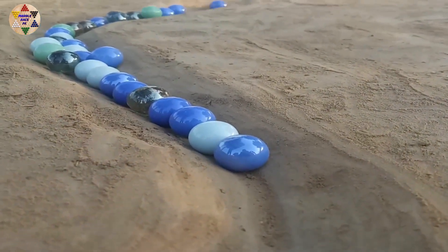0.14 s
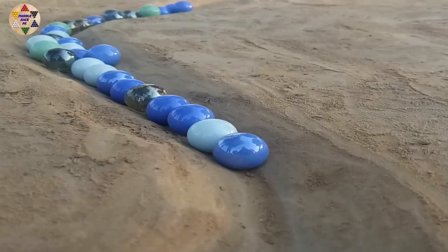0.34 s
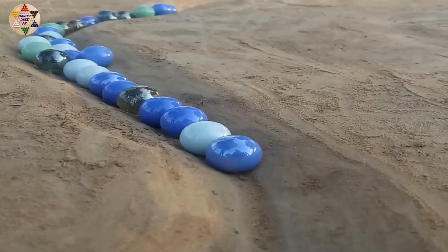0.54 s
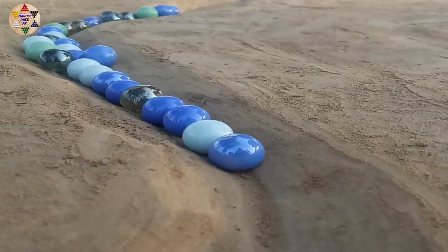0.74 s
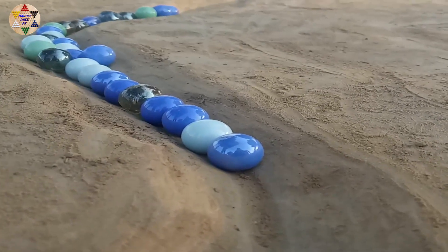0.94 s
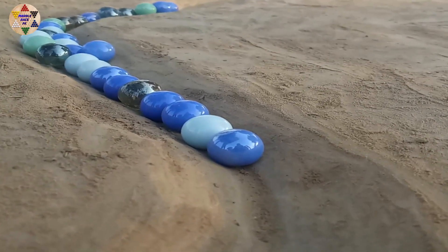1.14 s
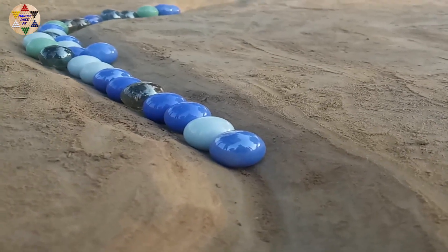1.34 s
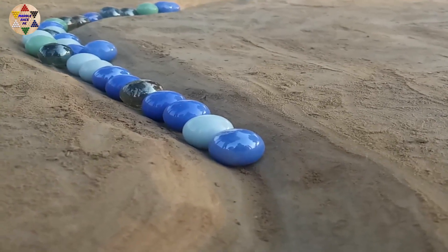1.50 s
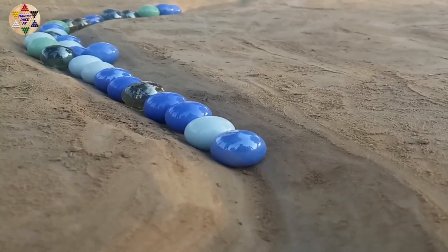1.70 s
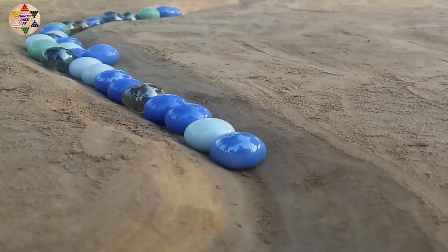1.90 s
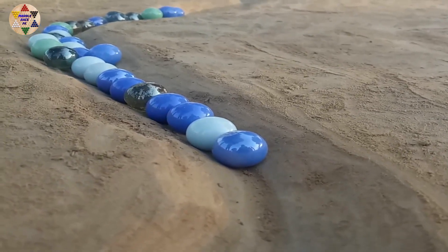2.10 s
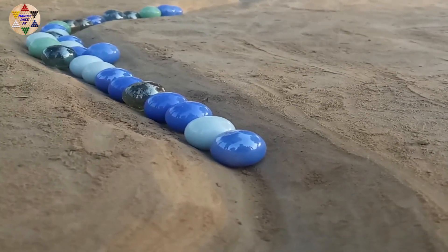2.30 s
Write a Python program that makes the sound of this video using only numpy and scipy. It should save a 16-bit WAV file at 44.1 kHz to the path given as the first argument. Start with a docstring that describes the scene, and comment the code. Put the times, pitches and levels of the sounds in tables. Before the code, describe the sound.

Close glass marbles clatter in quick bursts, drop to scattered clicks, then bunch up again. Underneath are a faint hiss of rolling on packed sand and a soft rumble from the hand-held microphone, which is bumped twice early on.

```python
"""Marbles rolling in sand

A train of glass marbles rolls down a groove in packed sand, close to a hand-held microphone and mostly
to its left. Friction gives a gritty hiss, and a soft rumble lies under everything. Collisions excite
flurries of very short clicks, each scattered by the neighbouring marbles. Two low bumps, the first
one double, jolt the microphone."""
import sys
import numpy as np
from scipy import signal
from scipy.fft import rfft, irfft
from scipy.io import wavfile

SR = 44100
rng = np.random.default_rng(int(sys.argv[2]) if len(sys.argv) > 2 else 0)


def to_wav(sig):
    """Store sig (one row per channel, or 1-D mono) as 16-bit WAV at the path in sys.argv[1].

    Samples outside -1..1 are clipped; the rate is SR.
    """
    pcm = np.clip(np.atleast_2d(sig), -1, 1) * 32767
    pcm = np.round(pcm).astype(np.int16)
    wavfile.write(sys.argv[1], SR, pcm.T)  # frames by channels


N = 103635
RIGHT_LEAD_S = .00022  # the marbles are heard slightly sooner on the right


def undb(db):
    """Amplitude ratio of a level in decibels."""
    return 10 ** (np.asarray(db) / 20)


def curve(table, column=1):
    """Linear interpolation of one column of a table over time."""
    rows = np.array(table)
    return np.interp(np.arange(N) / SR, rows[:, 0], rows[:, column])


def response(spectrum, size):
    """Magnitude response at each transform bin, interpolated in level against log frequency."""
    hz, db = np.array(spectrum).T
    f = np.maximum(np.fft.rfftfreq(size, 1 / SR), 1)
    return undb(np.interp(np.log(f), np.log(hz), db))


def filtered(x, spectrum):
    """Zero-phase filtering by multiplication of spectra."""
    return irfft(rfft(x) * response(spectrum, N), N)


def noise(spectrum, envelope=1):
    """White noise, amplitude-modulated, then filtered and scaled to unit variance."""
    y = filtered(envelope * rng.standard_normal(N), spectrum)
    return y / y.std()


def flicker(rate_hz):
    """Random modulation of unit variance, interpolated between independent values."""
    y = np.interp(np.arange(N) / SR * rate_hz, np.arange(N), rng.standard_normal(N))
    return y / y.std()


def unit(x):
    """Normalisation to unit energy."""
    return x / np.sqrt(np.sum(np.abs(x) ** 2))


def add(track, at_s, sound):
    """Superposition of a short sound on a track."""
    i = int(np.clip(round(at_s * SR), 0, N - 1))
    track[i:i + len(sound)] += sound[:N - i]


# Envelopes of rolling: t/s, relative grinding level/dB, relative grit level/dB
ROLLING_LEVELS = [(0, -40.5, -39.5), (.2, -40, -42.5), (.44, -42.5, -57), (.5, -65, -51.5),
                  (.54, -44.5, -60), (.62, -39, -51), (.79, -39.5, -43.5), (.86, -39.5, -39),
                  (.97, -37.5, -43.5), (1.06, -49, -41), (1.28, -37.5, -47), (1.52, -39.5, -46),
                  (1.61, -36.5, -37.5), (1.66, -49, -43), (1.8, -38.5, -36.5), (1.95, -48.5, -33.5),
                  (1.995, -51, -35.5), (2.05, -37.5, -38), (2.18, -43.5, -50.5), (2.35, -44, -53)]
# Spectra of grinding and of fine grit: f/Hz, level/dB
GRIND_SPECTRUM = [(150, -11.5), (350, -6), (650, -1), (900, -2), (1100, -1), (1350, 0.5), (1900, -0.5),
                  (2600, -19.5), (6000, -45.5)]
GRIT_SPECTRUM = [(900, -8), (1800, 0.5), (2500, 6.5), (3200, 3), (4200, 0), (5000, -16), (6200, -14),
                 (7300, -13.5), (9000, -25), (15500, -30)]
# Transmission of rolling to the right side: f/Hz, gain/dB
ROLLING_SHADOW = [(200, -7.5), (750, -6), (1300, -20.5), (2400, -20), (4400, -9), (15000, -16)]
def rolling(coherence=.7):
    """Friction noise: glass grinds over sand and crushes fine grains; the right side lies in shadow."""
    grind_gain = undb(curve(ROLLING_LEVELS) - 0.5 + 3 * flicker(rate_hz=60))
    grit_gain = undb(curve(ROLLING_LEVELS, column=2) + 3)
    grains = undb(4 * flicker(rate_hz=640))
    left, independent = (grind_gain * noise(GRIND_SPECTRUM) + grit_gain * noise(GRIT_SPECTRUM, grains)
                         for _ in range(2))
    advanced = np.roll(left, -int(RIGHT_LEAD_S * SR))
    right = coherence * advanced + np.sqrt(1 - coherence ** 2) * independent
    return np.array([left, filtered(right, ROLLING_SHADOW)])


# Spectrum of the rumble: f/Hz, level/dB
RUMBLE_SPECTRUM = [(35, -14), (65, 1), (110, 0), (155, -1), (210, -11.5), (350, -15.5), (800, -18),
                   (3000, -56)]
# Envelope of the rumble: t/s, level/dB
RUMBLE_ENVELOPE = [(0, -48.5), (.12, -40), (.3, -42), (.42, -39), (.6, -41), (.75, -38), (1.0, -43.5),
                   (1.13, -50), (1.3, -41.5), (1.61, -40), (1.65, -47.5), (1.82, -51.5), (2.0, -43.5),
                   (2.3, -39.5)]
def rumble(right_db=-6.5):
    """Handling noise: the moving microphone rumbles, in phase on both sides."""
    return undb([[0], [right_db]]) * undb(curve(RUMBLE_ENVELOPE)) * noise(RUMBLE_SPECTRUM)


# Light contacts between the clicks: t/s, rate/(1/s)
CONTACT_RATE = [(0, 130), (.17, 230), (.23, 200), (.3, 74), (.42, 98), (.45, 1), (.58, 0.56), (.75, 9.5),
                (1.04, 13), (1.1, 111), (1.3, 293), (1.42, 167), (1.52, 11.7), (1.69, 13.2), (1.73, 296),
                (1.775, 43), (1.85, 280), (1.96, 657), (1.995, 10), (2.03, 340), (2.08, 240), (2.11, 19)]
def jostling(count=400, centre_hz=3230, chatter_db=-1.5):
    """A random point process: light contacts grow denser and stronger where the train bunches up."""
    rate = curve(CONTACT_RATE)
    expected_count = np.cumsum(rate) / SR
    onsets = np.searchsorted(expected_count, np.arange(count) + rng.uniform(-1, 1, count))
    contacts = []
    for i, (strength, pitch, treble) in zip(onsets, rng.standard_normal((count, 3))):
        if i < N:
            db = -29 + 1.5 * strength + 3 * np.log2(rate[i] / 200)  # 3 dB per doubling of the rate
            contacts.append((i / SR, db, centre_hz * 2 ** (0.092 * pitch), -15 + 2 * treble, chatter_db))
    return collisions(contacts)


def minimum_phase(gain, size):
    """Causality: folding the cepstrum onto positive time gives the spectrum of a minimum-phase pulse."""
    cepstrum = irfft(np.log(gain))
    cepstrum[1:size // 2] *= 2
    cepstrum[size // 2 + 1:] = 0
    return np.exp(rfft(cepstrum))


# Scattering, strongest in the treble: f/Hz, relative gain/dB
SCATTER_SPECTRUM = [(500, 3.5), (1200, 0.5), (2500, -1.5), (4500, 3), (7000, 3.5), (14000, 7.5)]
def echoes(pulse_spectrum, decay_s, size):
    """Diffuse scattering: convolution with a decaying noise burst makes dense copies of a pulse."""
    t = np.arange(size) / SR
    reflections = rng.standard_normal(size) * np.sqrt(t) * np.exp(-t / decay_s)
    return unit(irfft(pulse_spectrum * response(SCATTER_SPECTRUM, size) * rfft(reflections)))


# Spectra of a click's body and of its treble snap: f/Hz, level/dB
BODY_SPECTRUM = [(100, -24), (550, -14), (900, 3.5), (1300, 1.5), (2100, 0.5), (2600, 1.5), (3300, -2),
                 (4300, -1), (5000, -12), (5800, -10), (6600, -73), (12000, -35)]
SNAP_SPECTRUM = [(1000, -31), (4500, -3), (5600, -2), (6300, 0), (7100, 5), (8700, -12.5), (10000, -13.5),
                 (11500, -10.5), (13000, -21), (15200, -19.5), (17000, -10)]
def click(hz, cutoff_hz, treble_db, chatter_db, scatter_s=0.00072, bank_s=0.0025, size=1024):
    """Damped resonance: an impact rings for a few cycles and reflects off marbles and sand banks."""
    f = np.fft.rfftfreq(size, 1 / SR) + 1
    half_width_oct = 0.26 * 2 ** rng.uniform(-.7, .7)
    resonance = undb(-18) + 1 / np.hypot(1, np.log2(f / hz) / half_width_oct)
    body = response(BODY_SPECTRUM, size) * resonance / np.hypot(1, (cutoff_hz / f) ** 2)
    snap = undb(treble_db - 1) * unit(response(SNAP_SPECTRUM, size))
    pulse = minimum_phase(np.hypot(unit(body), snap), size)
    left = unit(unit(irfft(pulse)) + undb(chatter_db - 2) * echoes(pulse, scatter_s, size))
    right = left + undb(-2) * echoes(pulse, scatter_s, size)
    sides = [unit(side + undb(-10.5) * echoes(pulse, bank_s, size)) for side in (left, right)]
    return np.array(sides) * np.sqrt(SR / 1000)  # the energy of 1 ms at unit level


# Marble against marble: t/s, level over 1 ms/dB, resonance f/Hz, relative treble/dB, relative chatter/dB
IMPACTS = [(0.0143, -15.5, 3930, -12, -5), (0.0279, -15.5, 3080, -14, -21), (0.0552, -14, 2960, -12, -13),
           (0.0877, -20.5, 3580, -14, 2), (0.0933, -17.5, 1520, -18, -4), (0.1001, -20, 2950, -14, -4),
           (0.1196, -14.5, 4040, -14, -2), (0.1212, -20, 3200, -8, 13), (0.1312, -16.5, 2800, -24, 1),
           (0.1522, -14, 2680, -16, -1), (0.1747, -17.5, 3380, -14, -25), (0.2125, -15.5, 3800, -11.5, 2),
           (0.2144, -13.5, 3270, -10, -1), (0.2168, -15.5, 3300, -31, 7), (0.2575, -12.5, 3160, -10, 1),
           (0.2654, -13.5, 2520, -8, -2), (0.2929, -16.5, 1860, -14, 4), (0.304, -17, 3400, -4, 3),
           (0.3071, -30, 3080, 10, -14), (0.3227, -11.5, 4430, -8, -10), (0.3493, -15, 3540, -14, 4),
           (0.366, -31, 3160, -3, 5), (0.3728, -17.5, 2130, -23, 9), (0.3803, -15, 2340, -11, -6),
           (0.3988, -16.5, 1629, -13, 14), (0.401, -16.5, 3350, -20, -14), (0.4282, -16.5, 2720, -7, -8),
           (0.4305, -13, 3500, -16, 10), (0.4454, -13.5, 3580, -12, -2), (0.539, -20, 2020, -13, 9),
           (0.5534, -22.5, 3680, -5, 17), (0.5626, -21.5, 3300, -8, -11), (0.5742, -13.5, 2520, -19, 0),
           (0.5763, -12, 3500, -7, -4), (0.614, -23, 2070, -10, -14), (0.6209, -19, 1490, -29, 16),
           (0.6302, -16.5, 2230, -11.5, -1), (0.6679, -27.5, 2300, -17, -6), (0.6825, -19.5, 1350, -38, -7),
           (0.6885, -13.5, 2290, -13.5, -40), (0.7112, -27, 3280, -22, 1), (0.7975, -15, 2260, -9.5, -12),
           (0.9502, -14, 2710, -16, -17), (0.9527, -13, 2577, -6.5, -14), (1.0061, -16.5, 3390, -15.5, -3),
           (1.033, -8.5, 2940, -14.5, -4), (1.0755, -21, 2525, -17, 11), (1.0986, -21, 3273, -35, 6),
           (1.1048, -18, 2980, -15, 13), (1.1148, -14, 3460, -12, -21), (1.1535, -23, 3164, -6, -4),
           (1.1634, -13.5, 2938, -11, -32), (1.1668, -16, 2720, -17, -1), (1.1713, -16, 3222, -23, -15),
           (1.1765, -42, 2900, -6, -9), (1.1819, -17.5, 3095, -23, -24), (1.1895, -13, 4100, -6, -31),
           (1.1913, -10.5, 2870, -14, -4), (1.1942, -15.5, 2550, -17, -27), (1.2472, -20, 1820, -10, -18),
           (1.2604, -14, 2830, -9, -17), (1.2763, -14.5, 2880, -18, 18), (1.2921, -15, 3420, -24, -2),
           (1.3005, -20, 2870, -12, 0), (1.3111, -26, 3840, -13, -10), (1.3189, -13, 2510, -17.5, -1),
           (1.3388, -19, 3708, -9, -17), (1.3632, -14, 3395, -14, -3), (1.3887, -18.5, 2635, -7.5, 7),
           (1.3964, -20, 3502, -21, -2), (1.4278, -16.5, 2630, -15, 7), (1.4458, -17, 2830, -12.5, 25),
           (1.5036, -22, 2547, -13, -6), (1.6385, -13, 2782, -8.5, -9), (1.6443, -11.5, 3180, -18, 7),
           (1.67, -10, 2400, -12.5, -10), (1.6996, -11, 2500, -24, 4), (1.7048, -16, 2800, -7, -13),
           (1.7069, -13.5, 2810, -24, 17), (1.712, -9.5, 3420, -14, -1), (1.7147, -16, 3100, -19, -6),
           (1.7293, -23, 3425, -10, -3), (1.7332, -14, 3430, -16, 4), (1.7403, -17, 3270, -14, 1),
           (1.7501, -14, 3340, -18, -16), (1.7561, -9.5, 2250, -12, -1), (1.7883, -16.5, 3000, -14, 5),
           (1.796, -16.5, 2864, -8.5, 0), (1.8054, -10.5, 2954, -12, 4), (1.8078, -13, 3800, -24, 18),
           (1.8094, -12.5, 2207, -21, -8), (1.8193, -13, 3370, -7, -8), (1.8366, -18, 2690, -6, -4),
           (1.8612, -18.5, 3150, -12, -4), (1.877, -32, 2992, -7, 7), (1.8863, -18.5, 3480, -6, -3),
           (1.8935, -17, 2706, -14, -5), (1.8987, -15, 2794, -12, -11), (1.9042, -22.5, 3000, -10, -4),
           (1.9242, -12, 3442, -11, -21), (1.9426, -25, 3368, 0, 20), (1.9476, -16, 3300, -13, 15),
           (1.9519, -19, 2824, -13, -9), (1.9578, -16, 2906, -10, -8), (1.9661, -26, 3222, -20, -10),
           (1.9761, -14.5, 3570, -8, -11), (1.9799, -17, 2630, -12, -14), (2.0126, -19, 3100, -12, -11),
           (2.0238, -17, 2750, -13, -5), (2.04, -13.5, 2330, -17, -4), (2.0512, -16, 1280, -12, -6),
           (2.0544, -21, 3127, -12, -13), (2.067, -12, 2930, -18, -12), (2.0755, -17, 2903, -8, -12),
           (2.0895, -21, 1844, -21, 13), (2.1202, -18, 2623, -14, -9), (2.1237, -20.5, 3140, -17, 8),
           (2.1372, -15, 2740, -15, -9), (2.145, -15, 3200, -22, 10), (2.1631, -13.5, 2500, -15, -8),
           (2.2069, -23, 2080, -15, -19), (2.2115, -22, 3137, -12, 6), (2.2186, -24, 3180, -11, 1),
           (2.2266, -19, 1930, -29, 1), (2.2326, -19, 2828, -11.5, -4), (2.2889, -27.5, 3060, -19, -6),
           (2.2965, -25.5, 2107, -20, -6), (2.335, -26, 1980, -18, -13)]
# Lower edge of the click spectrum, highest as the last flurry starts: t/s, f/Hz
LOW_CUTOFF = [(.7, 595), (1.6, 1100), (1.67, 1880), (1.82, 1860), (1.9, 800)]
# Transmission of clicks to the right side: f/Hz, gain/dB
CLICK_SHADOW = [(800, -9), (1400, -12.5), (2300, -15.5), (3500, -9.5), (7000, -7.5), (15000, -8.5)]
def collisions(contacts):
    """Impact sound: each contact radiates one click, which reaches the right side attenuated."""
    left, right = np.zeros((2, N))
    for at_s, db, hz, treble_db, chatter_db in contacts:
        cutoff_hz = np.interp(at_s, *np.array(LOW_CUTOFF).T)
        sides = undb(db) * click(hz, cutoff_hz, treble_db, chatter_db)
        add(left, at_s, sides[0])
        add(right, at_s - RIGHT_LEAD_S, sides[1])
    return np.array([left, filtered(right, CLICK_SHADOW)])


# Jolts of the microphone: t/s, level/dB, starting f/Hz, glide time/s, decay time/s, relative rattle/dB
JOLTS = [(0.4584, -2, 743, 0.00214, 0.0037, -40), (0.4685, 5.5, 928, 0.0015, 0.0015, -12.5),
         (0.8327, -8, 315, 0.0028, 0.0092, -46)]
# Spectrum of the rattling casing: f/Hz, level/dB
CASING_SPECTRUM = [(300, -10), (750, 5), (1300, -6), (1800, -15), (2400, -7), (3300, -32), (7000, -55)]
# Transmission of bumps to the right side: f/Hz, gain/dB
BUMP_TRANSMISSION = [(300, -2.5), (550, -9), (1200, -6)]
def bumps(end_hz=86, attack_s=0.00032, ring_s=0.012, rattle_s=0.0037, length_s=0.044, lag_s=.00061):
    """Structure-borne sound: a knock rattles the casing and sinks within a few cycles to a low boom."""
    left, right = np.zeros((2, N))
    t = np.arange(int(length_s * SR)) / SR
    window = (1 - np.exp(-t / attack_s)) * np.cos(np.pi / 2 * t / length_s)
    for at_s, db, hz, glide_s, decay_s, rattle_db in JOLTS:
        cycles = end_hz * t + (hz - end_hz) * glide_s * (1 - np.exp(-t / glide_s))
        decay = np.exp(-t / decay_s) + undb(-14.5) * np.exp(-t / ring_s)
        boom = -decay * np.sin(2 * np.pi * cycles)
        rattle = undb(rattle_db) * np.exp(-t / rattle_s) * noise(CASING_SPECTRUM)[:len(t)]
        jolt = undb(db) * window * (boom + rattle)
        add(left, at_s, jolt)
        add(right, at_s + lag_s, jolt)
    return np.array([left, filtered(right, BUMP_TRANSMISSION)])


def scene():
    """Linear superposition of all sources, left and right."""
    return rolling() + rumble() + bumps() + collisions(IMPACTS) + jostling()


def record(dry, cutoff_hz=16000):
    """Saturation and band limiting: clipping at full scale, then a steep low-pass filter."""
    lowpass = signal.ellip(8, .1, 60, cutoff_hz, fs=SR, output="sos")
    return signal.sosfiltfilt(lowpass, np.clip(dry, -1, 1))


dry = scene()
out = record(dry)
to_wav(out)
```